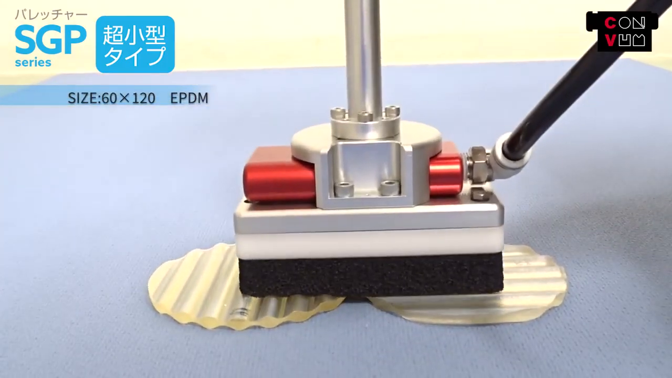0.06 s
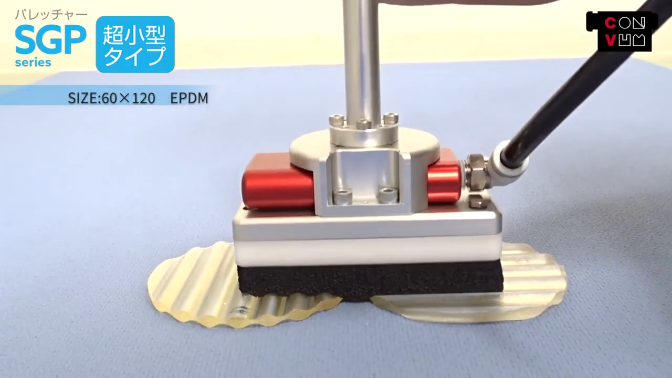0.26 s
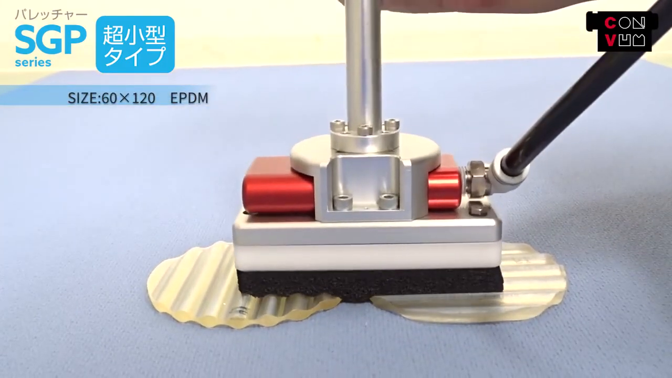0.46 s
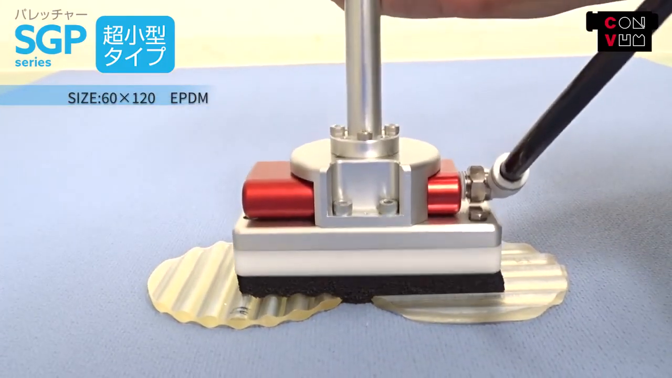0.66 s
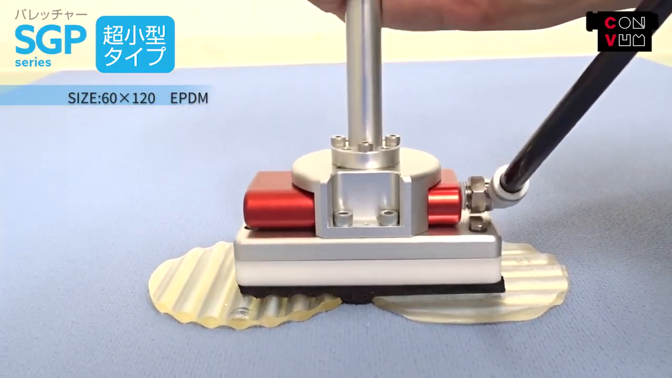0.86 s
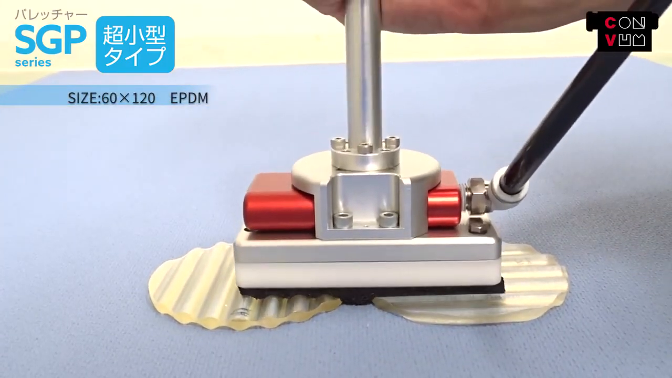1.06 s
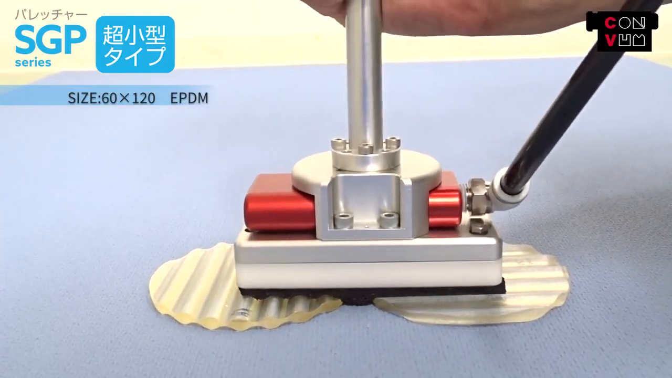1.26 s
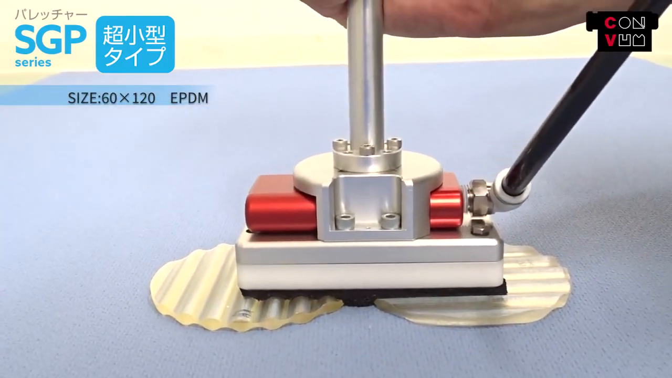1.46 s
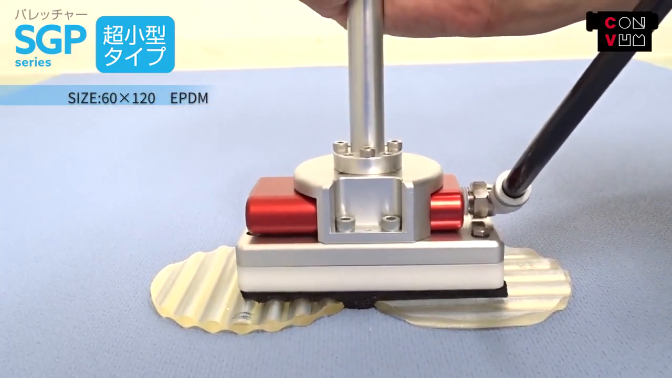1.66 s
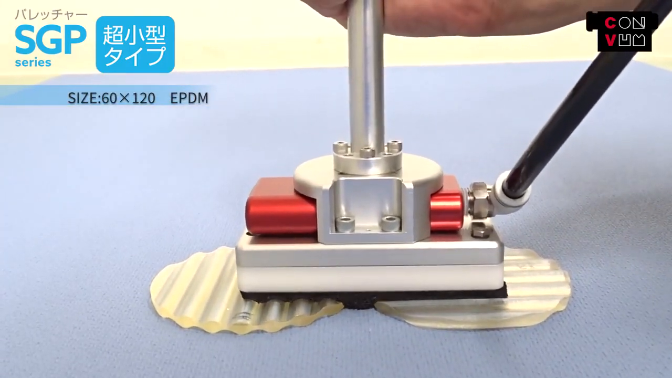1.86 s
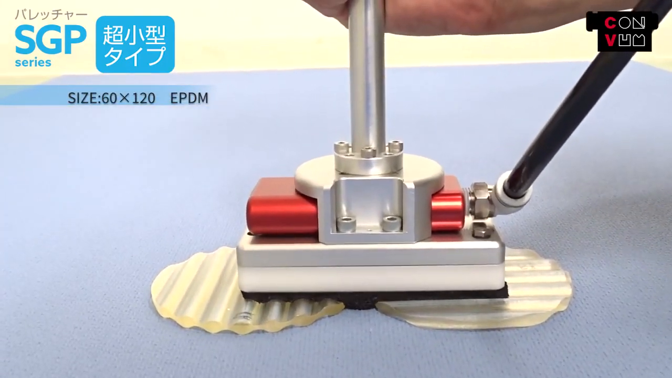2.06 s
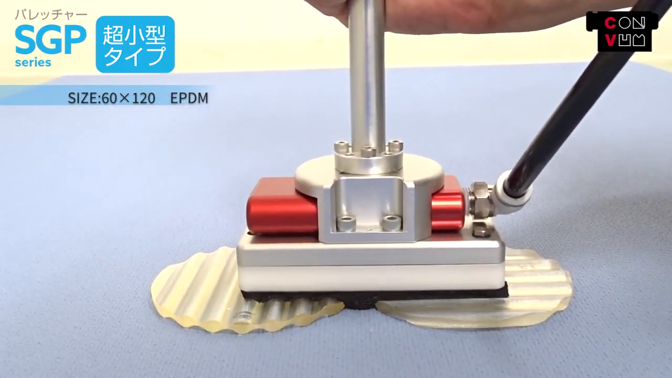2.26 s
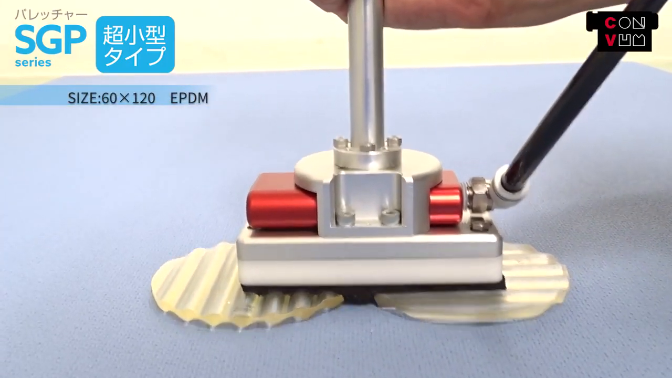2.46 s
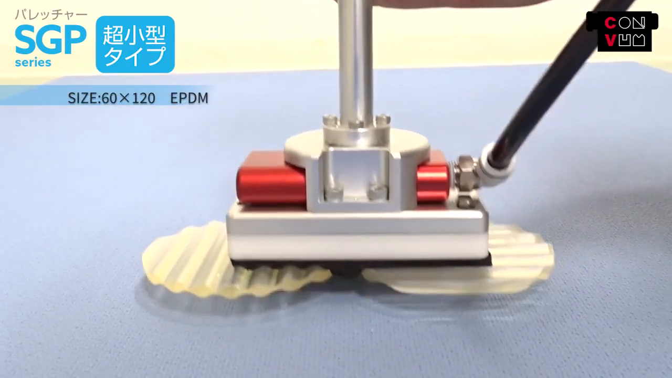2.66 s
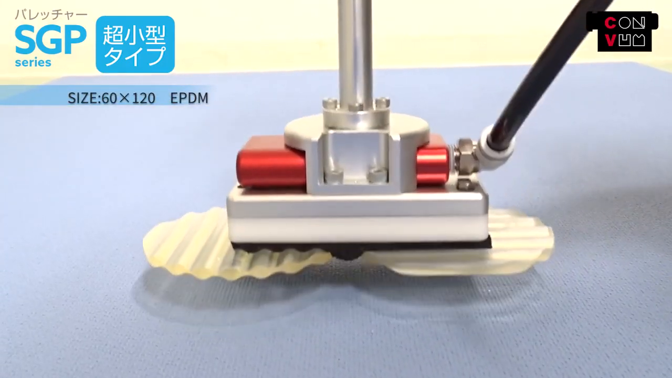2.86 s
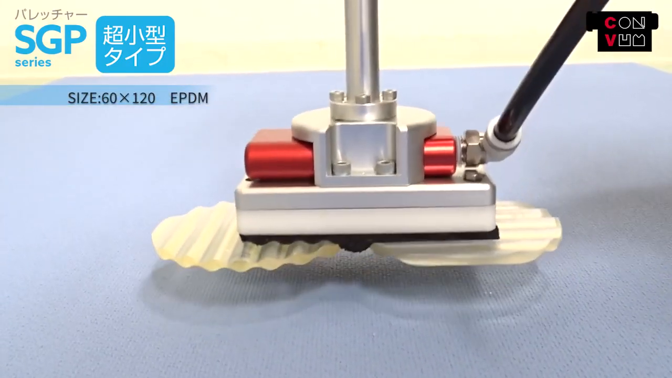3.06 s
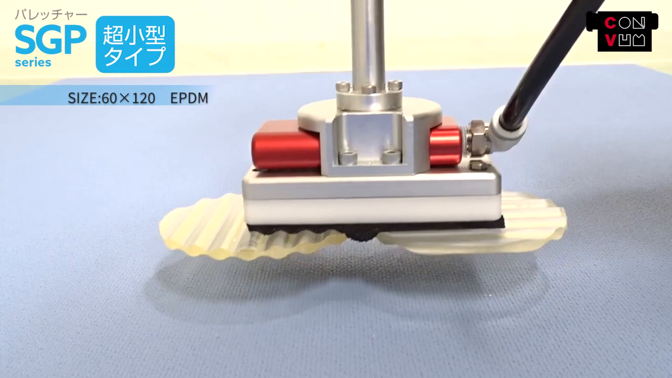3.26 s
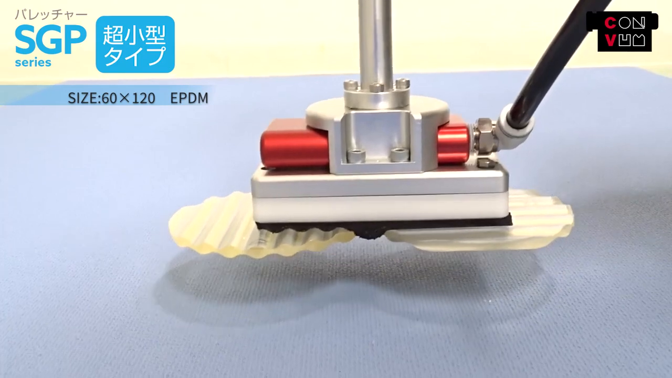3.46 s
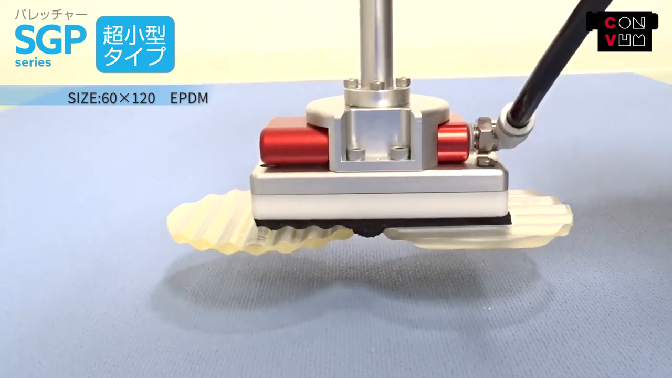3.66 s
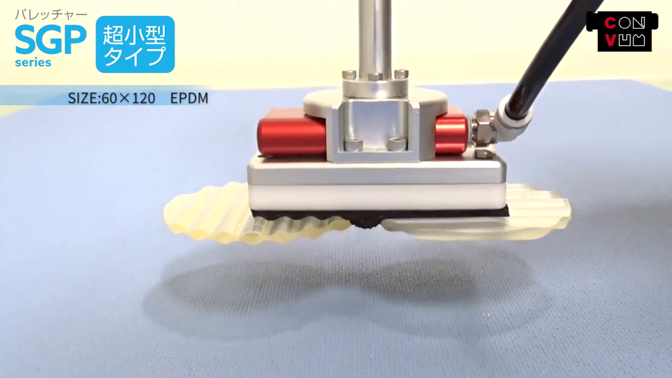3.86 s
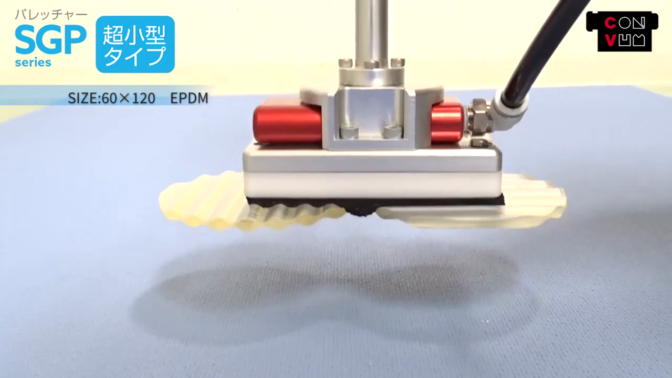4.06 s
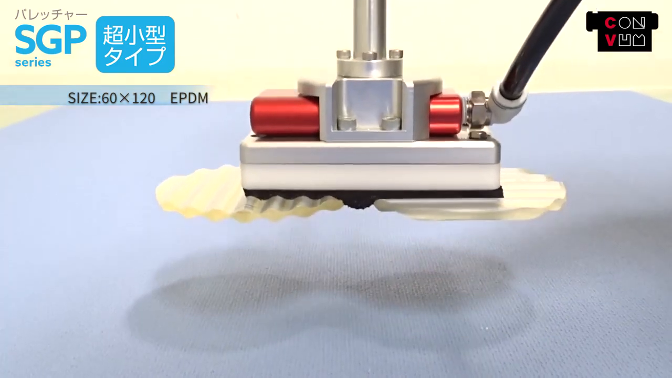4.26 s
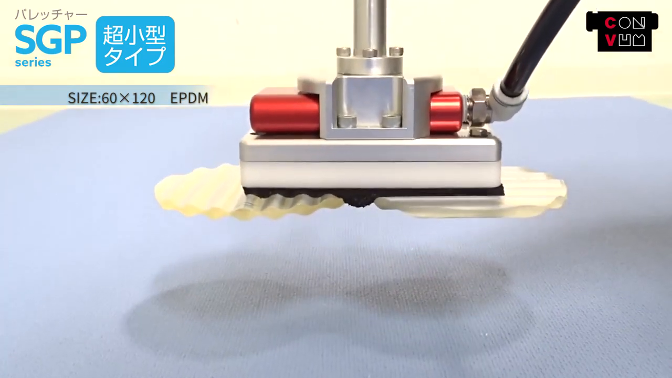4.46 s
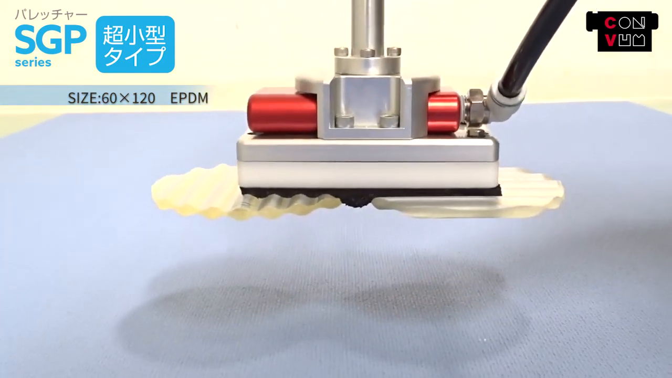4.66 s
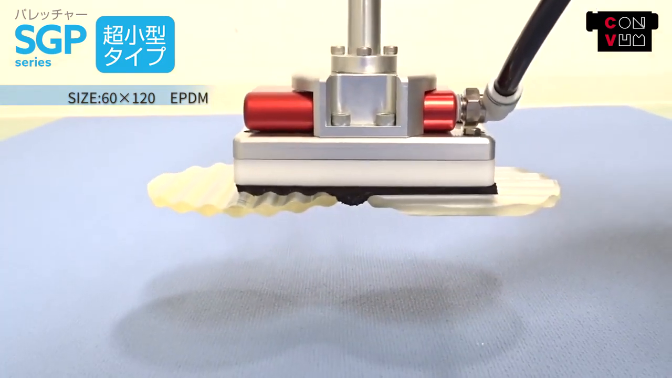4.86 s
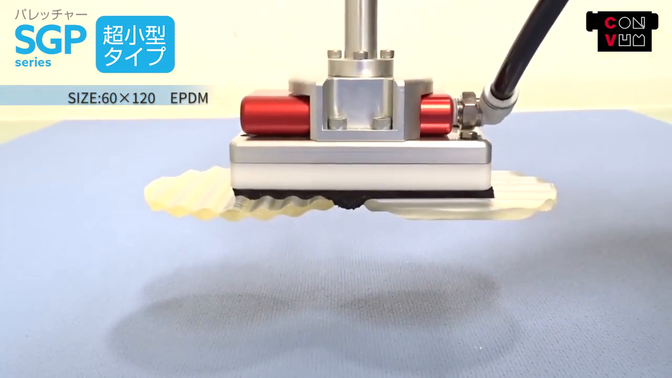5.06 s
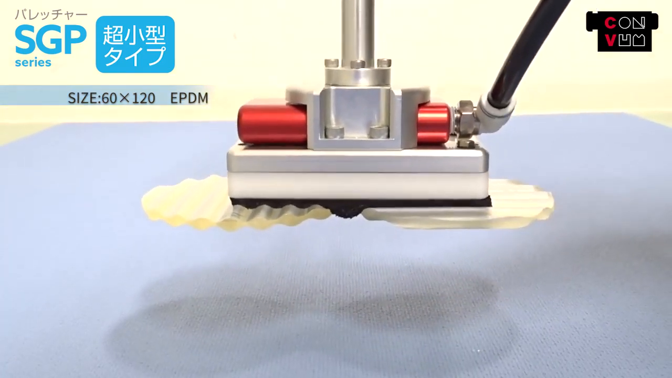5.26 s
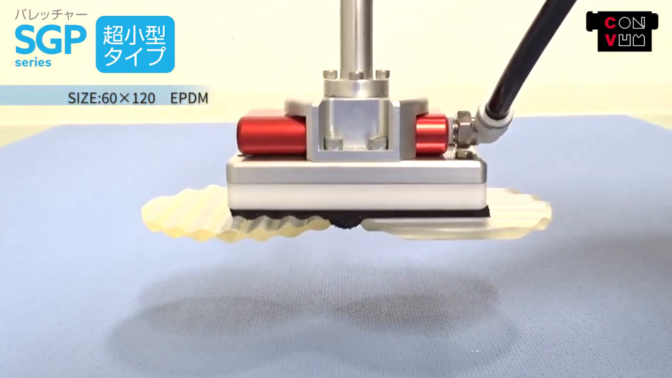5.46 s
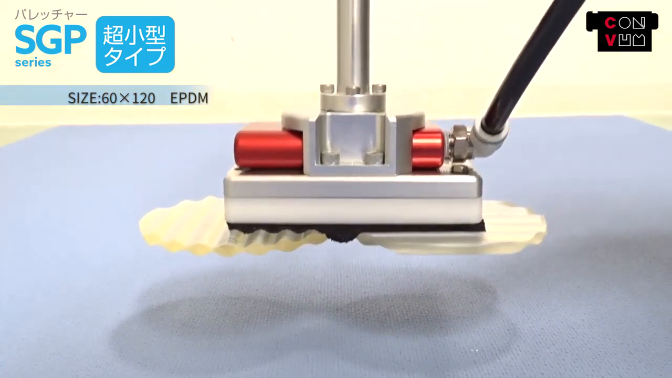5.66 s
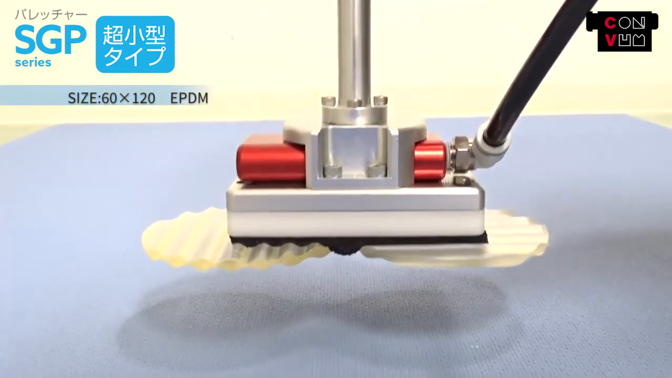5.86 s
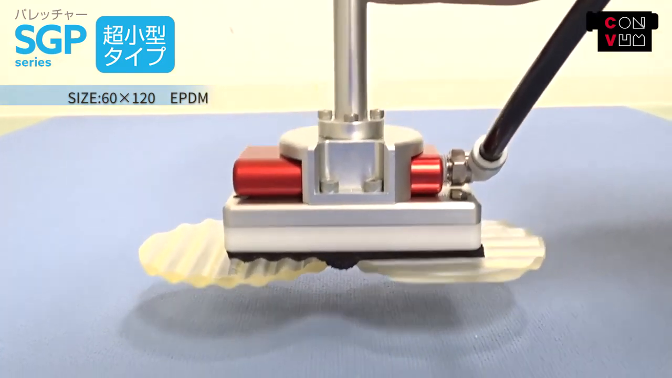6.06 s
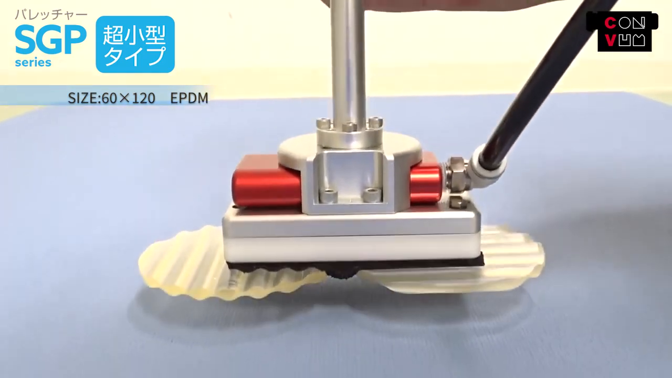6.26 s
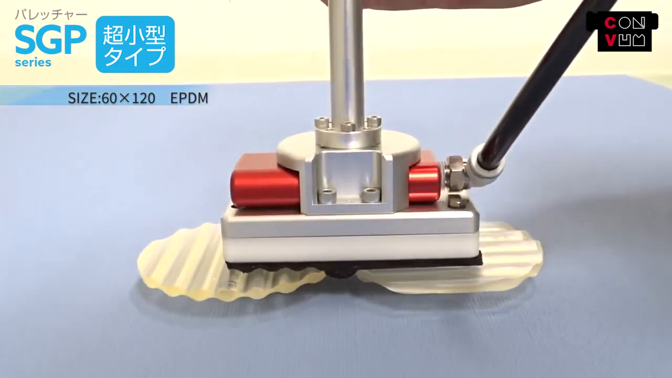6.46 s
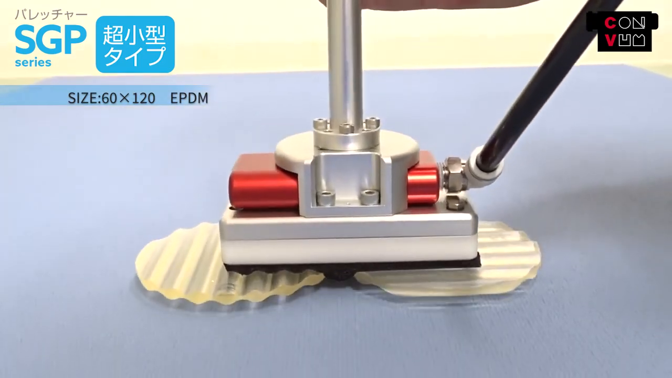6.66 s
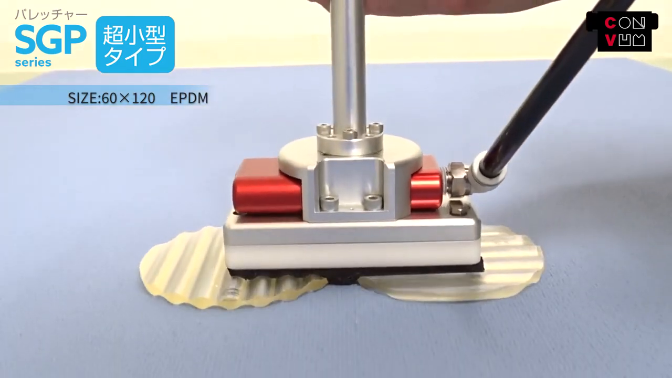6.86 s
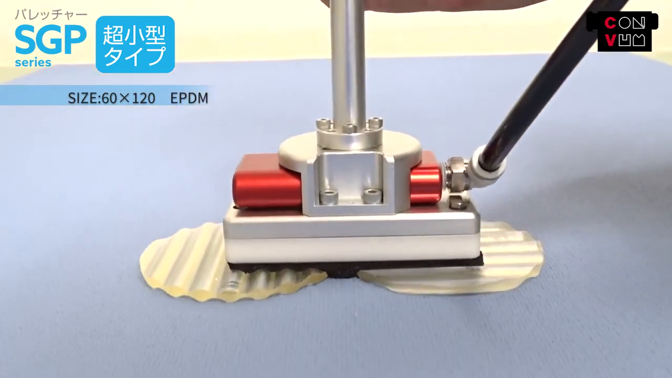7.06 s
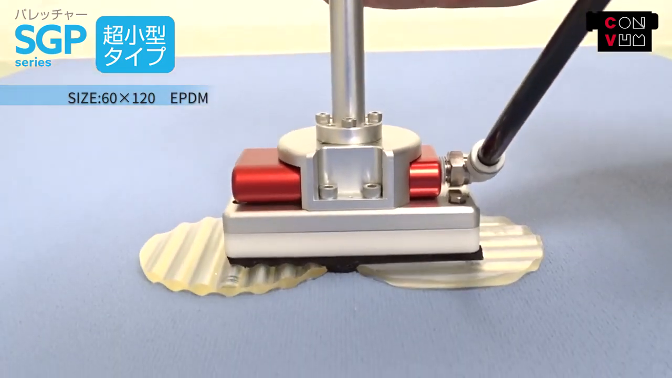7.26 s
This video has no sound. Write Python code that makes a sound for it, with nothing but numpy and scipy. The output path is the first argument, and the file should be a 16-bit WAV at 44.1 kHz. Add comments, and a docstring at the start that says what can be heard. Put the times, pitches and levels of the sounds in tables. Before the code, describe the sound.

A vacuum gripper presses onto two thin plates with a couple of soft, low bumps over a quiet room rumble. Its air valve opens with a dull puff that quickly brightens into a steady hiss of compressed air. The hiss subtly changes tone as the gripper is lifted, held and lowered, and keeps going to the end. The microphone is close, in a small room.

```python
"""A vacuum gripper is pressed onto two thin plates on a bench: soft low bumps over the room's rumble.
At 0.7 s its air valve opens with a dull puff that brightens into the steady hiss of the ejector's
exhaust, and the close microphone's gain control pushes the rumble down. From 2.35 s the hand lifts the
plates, and the hiss changes colour as the jet's beam turns and its echoes shift with height.
After a short hold the plates are set down, from 5.4 to 6.9 s, with the air still flowing."""
import sys
import numpy as np
from scipy import signal
from scipy.fft import rfft, irfft
from scipy.io import wavfile
from scipy.ndimage import uniform_filter1d

SR = 44100
rng = np.random.default_rng(int(sys.argv[2]) if len(sys.argv) > 2 else 0)


def to_wav(s):
    """Save 16-bit WAV."""
    ch = np.atleast_2d(s).T  # columns
    pcm = np.round(np.clip(ch, -1, 1) * 32767)  # PCM
    wavfile.write(sys.argv[1], SR, pcm.astype(np.int16))


N = 323253
TIME = np.arange(N) / SR
FFT_SIZE, HOP = 2048, 256
FRAME_TIME = np.arange(N // HOP + 9) * HOP / SR
BIN_HZ = np.fft.rfftfreq(FFT_SIZE, 1 / SR)
TOP_HZ = 11110


# Broad EQ of the exhaust hiss: f/Hz, level/dB
HISS_EQ = [(70, -52), (160, -32.5), (280, -28), (600, -16.5), (1180, -16), (1900, -6.5), (2700, -8),
           (3200, -15.5), (4050, -18.5), (4900, -11.5), (6000, -4.5), (7750, 0.5), (9700, -3.5),
           (11000, -6)]
# Peaks and notches of the port and the metal around it: f/Hz, width/Hz, gain/dB
PORT_RESONANCES = [(662, 55, 3.9), (1006, 52, 3.4), (1197, 120, -4.1), (1320, 100, 3.5), (1444, 20, 4.4),
                   (1483, 24, 3.3), (1593, 27, 4.6), (1688, 73, -3.5), (1914, 19, 2.5), (1984, 20, 3.6),
                   (2158, 42, -5.2), (2263, 28, 3.2), (2316, 18, 3.2), (2367, 24, 4.1), (2470, 36, 2.4),
                   (2583, 31, 5.1), (2855, 18, 4.7), (2939, 52, 4.6), (3826, 78, 2.2), (5449, 33, 3.1),
                   (5939, 60, 4.7), (6134, 60, 4.4), (6565, 26, 1.6), (6747, 18, 1.4), (7332, 18, 1.8),
                   (7872, 31, 2.8), (8332, 32, 2.2), (9599, 600, -5.0), (9710, 23, 3.5), (10473, 267, 2.9)]
# EQ that darkens the full-speed hiss into a slow jet's roar: f/Hz, gain/dB
ROAR_EQ = [(150, 12), (500, 0.5), (1500, -0.5), (2500, -3), (2950, -15), (3500, -19), (4300, -17),
           (6000, -25), (7800, -17.5), (10500, -24)]

def ejector(jet_db=-9.5, eddy_db=0.49, flutter_db=0.51):
    """Turbulent air leaves the port: a dull roar crossfades into bright hiss as the jet speeds up."""
    port_db = sum(db / (1 + (2 * (BIN_HZ - hz) / width) ** 2) for hz, width, db in PORT_RESONANCES)
    hiss = shaped_noise(eq_curve(HISS_EQ, BIN_HZ) + port_db + height_colour() + eddy_db * eddies())
    roar = equalise(hiss, ROAR_EQ)
    envelope_db, speed = valve(TIME)
    flow = gain_of(jet_db + envelope_db + flutter_db * wander(TIME, 4, 60))
    return flow * (roar + speed * (hiss - roar))


def valve(t, open_s=0.6976, attack_db_per_s=642, peak_db=9.5, hold_s=.016, drain_s=.05):
    """Jet envelope (dB) and speed (0-1): the flow swells, then the hose's stored pressure drains."""
    age = t - open_s
    attack_db = attack_db_per_s * np.minimum(age, 0)
    surge_db = peak_db * np.exp(-np.maximum(age - hold_s, 0) / drain_s)
    speed = smooth_step(age, start_s=-.004, length_s=.058)
    return attack_db + surge_db, speed


def eddies(count=12):
    """Each broad band of the jet flutters on its own: frames x bins, rms about 1."""
    centres_hz = np.linspace(0, TOP_HZ, count)
    bands = np.maximum(1 - abs(BIN_HZ - centres_hz[:, None]) / centres_hz[1], 0)
    flutters = np.transpose([wander(FRAME_TIME, 2.5, 25) for _ in centres_hz])
    return flutters @ np.sqrt(bands)


# The hand's moves (pull off, slow raise, set down): t/s, length/s, target height/cm
HAND_MOVES = [(2.35, .72, 2.35), (2.88, 2.1, 5.6), (5.36, 1.58, .33)]

def gripper_height(t, rest_cm=0.11):
    """Height over the bench (cm): the hand eases in and out of each move."""
    cm = np.full(len(t), rest_cm)
    for start_s, length_s, target_cm in HAND_MOVES:
        cm += (target_cm - cm) * smooth_step(t, start_s, length_s)
    return cm


def height_colour(count=120):
    """Beam and echoes make a moving EQ (dB, frames x bins) that follows the gripper's height."""
    height_cm = gripper_height(FRAME_TIME)
    steps_cm = np.linspace(height_cm.min(), height_cm.max(), count)[:, None]
    colour_db = jet_beam(steps_cm) + surface_echoes(steps_cm) + nearby_echoes(steps_cm)
    nearest_step = abs(steps_cm - height_cm).argmin(axis=0)
    return colour_db[nearest_step]


# Tone of the jet's beam at the microphone: f/Hz, gain on the bench/dB, gain raised/dB
BEAM_EQ = [(300, 0.2, 0.1), (1000, 1.9, -3.0), (1250, 2.9, 0.8), (2000, 1.4, -1.2), (2900, 0.8, -0.7),
           (3600, 2.2, 5.2), (4100, -0.8, 2.4), (4550, -4.9, -0.5), (5200, 1.1, -0.2), (6200, -1.2, -2.2),
           (7500, 0.0, 0.7), (8700, -0.2, -1.2), (9400, 1.9, 3.4), (10500, -3.4, -3.2)]

def jet_beam(height_cm, flat_cm=3.02):
    """The beam turns against the microphone: its EQ (dB) morphs from bench through flat to raised."""
    hz, bench_db, raised_db = np.transpose(BEAM_EQ)
    bench = eq_curve(np.c_[hz, bench_db], BIN_HZ)
    raised = eq_curve(np.c_[hz, raised_db], BIN_HZ)
    rise = height_cm / flat_cm - 1
    return bench * np.maximum(-rise, 0) + raised * np.maximum(rise, 0)


# Hard reflectors, the bench first: echo gain/ratio, delay at zero height/ms, added delay/(ms per cm)
REFLECTORS = [(.125, .095, .0375), (.04, 1.57, .049)]

def surface_echoes(height_cm):
    """Flat surfaces flange the hiss: combs (dB) whose teeth slide down as the paths lengthen."""
    comb_db = 0
    for gain, delay_ms, ms_per_cm in REFLECTORS:
        delay_s = (delay_ms + ms_per_cm * height_cm) / 1000
        comb_db += 20 * np.log10(abs(1 + gain * np.exp(-2j * np.pi * BIN_HZ * delay_s)))
    return comb_db


def nearby_echoes(height_cm, ripple_db=1.67, ms_per_cm=0.039, shelf_hz=1300, count=24):
    """Weak echoes off metal and equipment: a fine ripple (dB) that slides as the gripper moves."""
    ripple = 0
    for distance, side, phase in rng.random((count, 3)):
        delay_ms = 1.5 + 9 * distance + ms_per_cm * (2 * side - 1) * height_cm
        ripple += np.cos(2 * np.pi * (BIN_HZ * delay_ms / 1000 + phase))
    treble_weight = BIN_HZ / np.hypot(BIN_HZ, shelf_hz)  # small objects reflect only short waves
    return ripple_db * unit_rms(ripple) * treble_weight


# Soft handling thumps, last the valve's jolt: t/s, peak level/dB, f/Hz, swell and decay/s
THUMPS = [(.113, -44, 193, 0.011), (.215, -45, 72, 0.024), (.678, -34.5, 189, 0.007)]

def gripper_bumps():
    """Each push rocks the hand-held gripper for a few low cycles."""
    out = np.zeros(N)
    for start_s, db, hz, decay_s in THUMPS:
        age = np.maximum(TIME - start_s, 0)
        envelope = age / decay_s * np.exp(1 - age / decay_s)
        out += gain_of(db) * envelope * np.sin(2 * np.pi * hz * age)
    return out


def room_reverb(x, wet_db=-10, t60_s=0.24, predelay_s=.004):
    """The walls return a short diffuse tail."""
    t = np.arange(SR // 2) / SR
    tail = rng.standard_normal(len(t)) * gain_of(-60 * t / t60_s) * (t > predelay_s)
    return x + gain_of(wet_db) * signal.fftconvolve(x, tail / np.linalg.norm(tail))[:N]


# Bass-heavy EQ of the room tone: f/Hz, level/dB
RUMBLE_EQ = [(30, -10.5), (70, -5.5), (110, -5), (190, 0), (300, -11.5), (500, -13), (800, -18.5),
             (1400, -17.5), (1900, -33), (3000, -37.5), (6000, -46), (9500, -37), (11000, -44)]

def room_rumble(level_db=-50, swell_db=1.3, bass_hz=700):
    """A quiet bed of room noise whose bass swells unevenly."""
    swell = swell_db * wander(FRAME_TIME, 3, 16)[:, None] / (1 + (BIN_HZ / bass_hz) ** 2)
    return gain_of(level_db) * shaped_noise(eq_curve(RUMBLE_EQ, BIN_HZ) + swell)


# Faint electronic tones: f/Hz, rms level/dB
WHINE_TONES = [(7197, -80.5), (9001, -77)]

def electronic_whine():
    """Electronics add a thin, steady whine."""
    return sum(np.sqrt(2) * gain_of(db) * np.sin(2 * np.pi * hz * TIME) for hz, db in WHINE_TONES)


def gain_of(db):
    """Decibels to amplitude."""
    return 10 ** (np.asarray(db) / 20)


def unit_rms(x):
    """Normalises to rms 1."""
    return x / np.sqrt(np.mean(x ** 2) + 1e-20)


def smooth_step(t, start_s, length_s):
    """An S-curve fade from 0 to 1."""
    return .5 - .5 * np.cos(np.pi * np.clip((t - start_s) / length_s, 0, 1))


def wander(t, slow_hz, fast_hz, count=40):
    """A random modulator of rms 1: sines of random phase."""
    rates_hz = np.geomspace(slow_hz, fast_hz, count)
    return unit_rms(sum(np.sin(2 * np.pi * (hz * t + rng.random())) / np.sqrt(hz) for hz in rates_hz))


def eq_curve(points, hz):
    """Joins (f/Hz, level/dB) points on a log-frequency axis."""
    point_hz, db = np.transpose(points)
    return np.interp(np.log(hz + 1), np.log(point_hz + 1), db)


def equalise(x, points):
    """Filters x through an EQ curve."""
    hz = np.fft.rfftfreq(2 * N, 1 / SR)
    return irfft(rfft(x, 2 * N) * gain_of(eq_curve(points, hz)))[:N]


def shaped_noise(eq_db):
    """Noise of rms 1 coloured by a moving EQ (frames x bins)."""
    real, imag = rng.standard_normal((2, len(FRAME_TIME), len(BIN_HZ)))
    frames = (real + 1j * imag) * gain_of(eq_db)
    _, noise = signal.istft(frames.T, nperseg=FFT_SIZE, noverlap=FFT_SIZE - HOP)
    return unit_rms(noise[:N])


def scene():
    """The gripper over the room tone; one microphone feeds both channels."""
    mono = room_reverb(ejector() + gripper_bumps()) + room_rumble() + electronic_whine()
    return np.array([mono, mono])


def gain_control(x, threshold_db=-26, share=0.87, attack_s=0.0054, release_db_per_s=19):
    """Ducks the whole mix, a little late, by a share of its excess over the threshold."""
    power = uniform_filter1d((x ** 2).mean(0), size=440)
    power_db = 10 * np.log10(abs(power) + 1e-12)
    release_db = release_db_per_s * TIME  # the gain creeps back after each peak
    held_db = np.maximum.accumulate(power_db + release_db) - release_db
    excess_db = np.maximum(held_db - threshold_db, 0)
    pole = np.exp(-1 / (attack_s * SR))
    return x * gain_of(-share * signal.lfilter([1 - pole], [1, -pole], excess_db))


def record(dry):
    """Gain control, then a steep high cut."""
    high_cut = signal.firwin(1023, TOP_HZ, window=("kaiser", 9), fs=SR)
    return signal.oaconvolve(gain_control(dry), high_cut[None], "same", axes=1)


dry = scene()
out = record(dry)
to_wav(out)
```